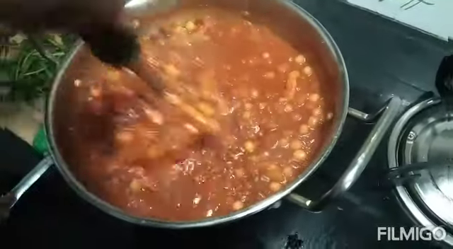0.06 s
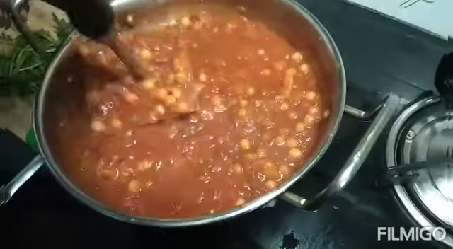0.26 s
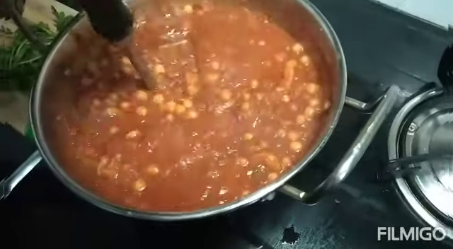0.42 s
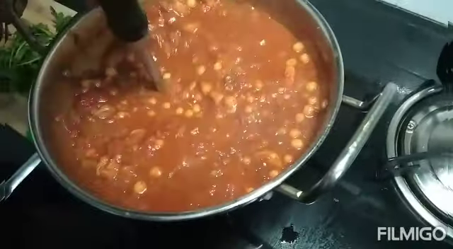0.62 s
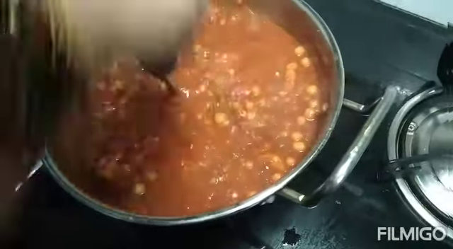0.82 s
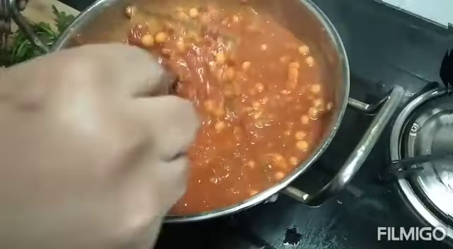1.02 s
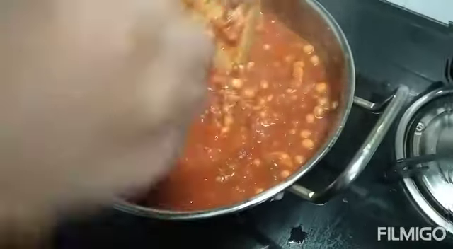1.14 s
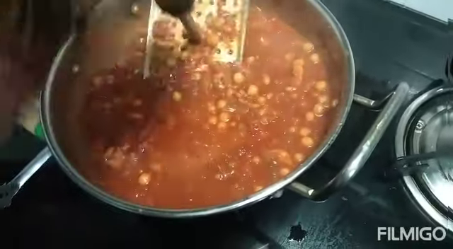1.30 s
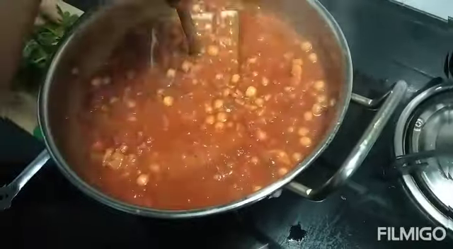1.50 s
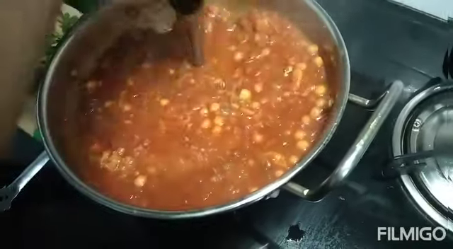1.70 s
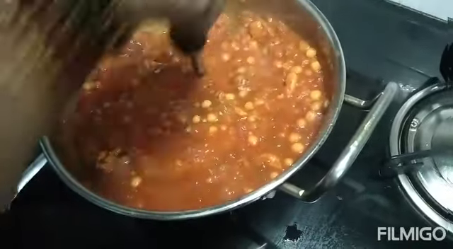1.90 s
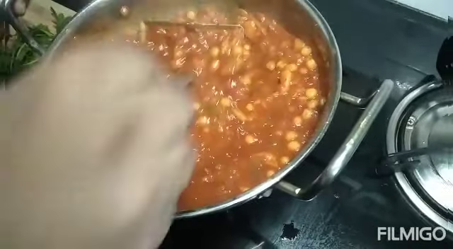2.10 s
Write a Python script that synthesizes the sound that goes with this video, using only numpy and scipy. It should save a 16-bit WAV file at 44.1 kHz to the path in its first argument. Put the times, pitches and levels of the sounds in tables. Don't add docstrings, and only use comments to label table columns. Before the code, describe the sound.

Metal clanks and muffled thuds of a masher stirring sauce in a steel pan, with little wet spits between. Gas flame hiss and a faint appliance hum sit below; hard kitchen walls add a tail, treble slightly dulled.

```python
import sys
import numpy as np
from scipy import signal
from scipy.fft import rfft, irfft
from scipy.io import wavfile
from scipy.ndimage import uniform_filter1d

SR = 44100
rng = np.random.default_rng(int(sys.argv[2]) if len(sys.argv) > 2 else 0)


def invert_db(x):
    u = np.asarray(x, float) / 20
    return 10 ** u


def dump(signal):
    limited = np.clip(np.atleast_2d(signal).T, -1, 1)
    pcm = np.round(limited * 32767).astype(np.int16)
    wavfile.write(sys.argv[1], SR, pcm)


N = 94815
CONTACT = SR // 10
EDGES = 35 * 2 ** np.arange(0, 9, 1 / 3)


def rms_one(x):
    return x / np.sqrt(np.mean(x ** 2) + 1e-20)


def at_hz(points, hz):
    table_hz, values = np.array(points).T
    return np.interp(np.log(hz), np.log(table_hz), values)


def band(x, low, high):
    sos = signal.butter(2, [low, min(high, .45 * SR)], "band", fs=SR, output="sos")
    return signal.sosfilt(sos, x + 1e-18)


def bank(gain, size):
    settle = 4000
    white = rng.standard_normal((2, size + settle))
    out = np.zeros(size)
    for k, (low, high) in enumerate(zip(EDGES, EDGES[1:])):
        out += gain(np.sqrt(low * high)) * band(white[k % 2], low, high)[settle:]
    return out


def drift(rate):
    r = np.exp(-2 * np.pi * rate * 40 / SR)
    slow = signal.lfilter([1], [1, -2 * r, r * r], rng.standard_normal(N // 40 + 2002))[2000:]
    return np.interp(np.arange(N) / 40, np.arange(len(slow)), rms_one(slow))


def burst(rise_s, dies_s):
    t = np.arange(CONTACT) / SR
    build = np.clip(t / max(rise_s, 1e-4), 0, 1) ** 2
    return build * np.exp(-np.maximum(t - rise_s, 0) / max(dies_s, 3e-4))


def modes(table):
    t = np.arange(SR) / SR
    ring = np.zeros(SR)
    for hz, db, t60 in table:
        decay = invert_db(db + rng.normal(0, 2) - 60 * t / t60)
        ring += decay * np.sin(2 * np.pi * hz * t) * rng.choice([-1, 1])
    return ring


def puff(spectrum, rise_s, dies_s):
    grit_db = 3.5
    grains = invert_db(grit_db * np.minimum(rng.exponential(1, CONTACT), 4))
    grit = rfft(rng.standard_normal((2, CONTACT)) * grains * burst(rise_s, dies_s))
    even = grit / np.sqrt(uniform_filter1d(np.abs(grit) ** 2, size=15, axis=1))
    white = irfft(even) * (np.arange(CONTACT) < SR // 20)
    out = np.zeros(CONTACT)
    for k, (low, high) in enumerate(zip(EDGES[6:], EDGES[7:])):
        level = invert_db(at_hz(spectrum, np.sqrt(low * high))) * np.sqrt(high - low)
        out += level * rms_one(band(white[k % 2], low, high))
    return rms_one(out) / 10


def add(out, s, x):
    i = int(s * SR)
    out[i:i + len(x)] += x[:N - i]


def cut(x, hz, wide_hz, left):
    w, r = 2 * np.pi * hz / SR, np.exp(-np.pi * wide_hz / SR)
    peak = signal.lfilter((1 - r * r) / 2 * np.array([1, 0, -1]), [1, -2 * r * np.cos(w), r * r], x)
    return x - (1 - left) * peak


def hum():
    # pitch in Hz, rms level in dB, wavering in dB.
    tones = [
        (128.5, -69, 5),
        (715.5, -63.5, 1.5),
    ]
    t = np.arange(N) / SR
    out = np.zeros(N)
    for hz, db, waver_db in tones:
        level = invert_db(db + 1.5 + waver_db * drift(2.9))
        out += level * np.sin(2 * np.pi * hz * t + .5 * drift(5.6))
    return out


def simmer():
    # time in seconds, level in dB.
    stirring = [
        (0.0, -39),
        (0.23, -59.5),
        (0.37, -38),
        (0.42, -57),
        (0.78, -35),
        (1.05, -54),
        (1.4, -48.5),
        (1.55, -21),
        (1.86, -53),
        (2.15, -42.5),
    ]
    # frequency in Hz, level in dB.
    hiss_colour = [(40, -24), (110, -9.5), (300, -8), (800, -9), (1500, -12.5), (4000, -18.5),
                   (9000, -23.5), (14500, -30)]
    hiss_db, fizz_db, fizz_per_s = -61, -75.5, 150
    follows = 0.22
    s, db = np.transpose(stirring)
    stir_db = follows * (np.interp(np.arange(N) / SR, s, db) - db.min())
    together = drift(2.1)
    hiss = bank(lambda hz: invert_db(at_hz(hiss_colour, hz) + 0.4 * together + 0.72 * drift(3.3)), N)
    sizes = invert_db(3.2 * np.minimum(rng.exponential(1, N), 3))
    pops = sizes * (rng.random(N) < fizz_per_s / SR)
    fizz = band(pops, 2200, 10100)
    return invert_db(stir_db) * (invert_db(hiss_db) * rms_one(hiss) + invert_db(fizz_db) * rms_one(fizz))


def spits():
    # start in seconds, peak in dB, pitch in Hz, length in seconds.
    wet_spits = [(0.026, -53.5, 4260, 0.006), (0.072, -55, 8200, 0.0077), (.092, -54, 7250, 0.0068),
                 (0.104, -46, 3300, 0.0012), (0.109, -51.5, 4000, .003), (0.31, -41, 2000, 0.0032),
                 (.348, -30.5, 9100, 0.004), (0.764, -47, 4000, 0.0024), (.786, -54.5, 4960, .004),
                 (0.935, -44.5, 10200, 0.005), (0.983, -54, 5150, 0.022), (1, -47, 9000, .012),
                 (1.002, -48.5, 13500, 0.012), (1.317, -46, 1700, 0.0027), (1.336, -55, 5650, 0.0034),
                 (1.374, -40, 7840, 0.0075), (1.612, -42, 1270, 0.0028), (1.681, -48, 6000, 0.0072),
                 (1.72, -45, 4000, 0.0021), (1.754, -49, 4000, 0.0038), (2.013, -45.5, 9500, 0.001),
                 (2.049, -61.5, 4070, 0.045), (2.072, -50, 3980, 0.0021), (2.092, -56.5, 4300, 0.066),
                 (2.116, -43.5, 10000, 0.0037)]
    half_octaves = 0.67 / 2
    out = np.zeros(N)
    for s, db, hz, length_s in wet_spits:
        wet = band(rng.standard_normal(CONTACT), hz * 2 ** -half_octaves, hz * 2 ** half_octaves)
        add(out, s, invert_db(db - 0.5) * rms_one(wet) * burst(0.003, length_s))
    return out


def knocks():
    # start in seconds, peak in dB, brightness in dB, build-up in seconds.
    landings = [(.233, -23, -20, 0.0033), (.299, -30.5, -8, 0.0021), (.537, -33.5, 2.5, 0.0035),
                (.560, -53, -8, .003), (0.6589, -27, 3, 0.00082), (0.689, -36.5, -26, 0.0035),
                (.720, -47, 3, 0.0028), (1.402, -25, -25, 0.0056), (1.420, -31, -25, 0.0014),
                (1.819, -29.5, -0.5, 0.00053), (1.850, -37.5, -12, 0.0025)]
    # frequency in Hz, level in dB.
    dull_colour = [(280, -5.5), (420, -4.5), (540, -12.5), (860, 8.5), (1300, -3.5), (1700, -8.5),
                   (2600, -7.5), (5000, -44)]
    # frequency in Hz, level in dB, t60 in seconds.
    bottom = [(106.5, -15.5, 0.29), (294.8, -4.5, .1), (351.7, -3.5, 0.07), (419.4, -1, 0.082),
              (639.5, -2.5, 0.097), (778, 0.5, 0.1), (838, -4.5, 0.2), (875, -1.5, 0.15),
              (972.6, -3.5, 0.13), (1080, -38, 0.087), (1256, -3, 0.04)]
    dies_s, knock_db, ring_db, tick_db = 0.012, 2, -11, -17
    out = np.zeros(N)
    for s, db, bright_db, rise_s in landings:
        tick = rms_one(band(rng.standard_normal(CONTACT), 2500, 9300)) * burst(0.0013, 0.0067)
        contact = puff(dull_colour, rise_s, dies_s) + invert_db(tick_db + bright_db) * tick
        add(out, s, invert_db(db + knock_db) * contact)
        swell = np.clip(np.arange(SR) / SR / max(rise_s, 1e-4), 0, 1)
        add(out, s, invert_db(db + ring_db) * modes(bottom) * swell)
    return out


def clacks():
    # start in seconds, peak in dB, build-up in seconds, dying in seconds, shaft ring in dB.
    wall_hits = [
        (0.1998, -10, .0035, 0.0058, -2.5),
        (1.3772, -14.5, 0.00145, 0.0042, -8.5),
    ]
    # frequency in Hz, level in dB per Hz.
    high_colour = [(240, -47), (400, -17.5), (1800, -11.5), (2180, -12.5), (4200, -12.5), (5090, -17),
                   (5570, -18.5), (9800, -13.5), (14000, -77)]
    # frequency in Hz, level in dB per Hz.
    low_colour = [(240, -21.5), (400, -7.5), (1440, -4.5), (1570, -14), (2150, -1.5), (3900, -9),
                  (5170, -15.5), (10600, -10.5), (14000, -44)]
    # frequency in Hz, level in dB, t60 in seconds.
    steel = [(1285, -1.5, 0.18), (1473, -6.5, 0.19), (1956, 0.5, 0.16), (2160, -3, 0.48), (2190, -1, 0.15),
             (2206, -1, 0.22), (2241, 1.5, 0.21), (2266, -6, 0.53), (3040, -17, 0.064), (4000, 3, 0.12),
             (4130, -9.5, 0.079), (5185, -7, 0.01)]
    crack_db, steel_db = 2.5, -16
    out = np.zeros(N)
    for (s, db, rise_s, dies_s, ring_db), colour in zip(wall_hits, (high_colour, low_colour)):
        add(out, s, invert_db(db + crack_db) * puff(colour, rise_s, dies_s))
        add(out, s + rise_s, invert_db(db + steel_db + ring_db) * modes(steel))
    return out


def kitchen(x):
    # frequency in Hz, t60 in seconds.
    room_t60 = [(150, 0.72), (400, 0.81), (1000, 0.91), (2700, .75), (7000, 0.88), (13000, 0.75)]
    rise_s = 0.0027
    t = np.arange(int(1.5 * SR)) / SR
    tail = bank(lambda hz: invert_db(-60 * t / at_hz(room_t60, hz)), len(t)) * (1 - np.exp(-t / rise_s))
    return signal.fftconvolve(x, tail / np.sqrt(np.sum(tail ** 2)))[:N]


def scene():
    # frequency in Hz, width in Hz, share left.
    hollows = [
        (539, 110, 0.37),
        (1700, 290, 0.4),
    ]
    room_db = -4
    pan, sauce = clacks() + knocks(), spits()
    for hz, wide_hz, left in hollows:
        pan = cut(pan, hz, wide_hz, left)
    echoes = invert_db(room_db) * kitchen(pan + 0.76 * sauce)
    return (pan + sauce + echoes + simmer() + hum())[None]


def roll_off(x):
    return signal.sosfilt(signal.butter(12, 15270, fs=SR, output="sos"), x)


def record(dry):
    x = cut(dry, hz=5157, wide_hz=447, left=0.44)
    x = cut(x, hz=6000, wide_hz=1940, left=0.6)
    x = cut(x, hz=11150, wide_hz=2000, left=0.38)
    ceiling, low_cut_hz = 0.66, 43
    x = ceiling * np.tanh(x / ceiling)
    x = signal.sosfilt(signal.butter(2, low_cut_hz, "high", fs=SR, output="sos"), x)

    gate_db, local_gate_db = -22, -7
    gate_from_hz, top_hz = 4900, 14500
    hz, _, z = signal.stft(x, SR, nperseg=2048)
    hz = hz[:, None]
    power = np.abs(z) ** 2 + 1e-20
    near = uniform_filter1d(power, size=10, axis=1)
    whole = power[:, :700].mean(axis=1, keepdims=True)
    around = uniform_filter1d(power, size=140, axis=1)
    whole_db = 10 * np.log10(near / whole) - gate_db
    local_db = 10 * np.log10(near / around) - local_gate_db
    opening = np.clip(np.minimum(whole_db, local_db) / 2, 0, 1)
    keep = np.where(hz > gate_from_hz, opening, 1) * (hz < top_hz)
    mix = signal.istft(z * keep, SR, nperseg=2048)[1][:, :N]
    return roll_off(mix)


dry = scene()
out = record(dry)
dump(out)
```